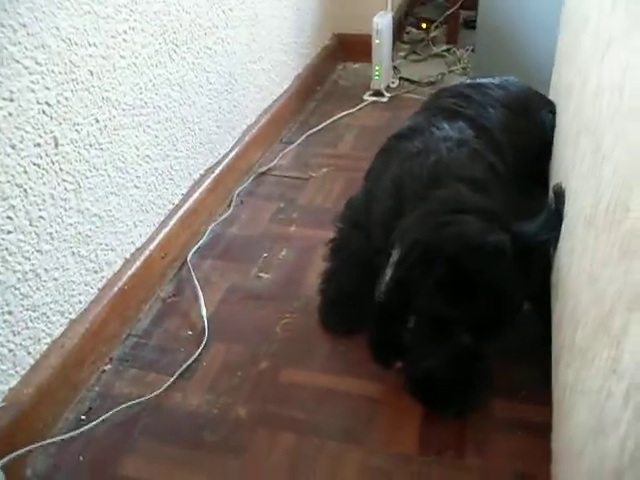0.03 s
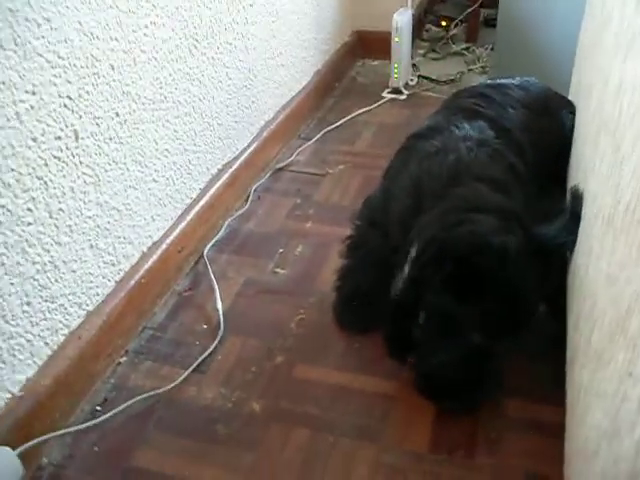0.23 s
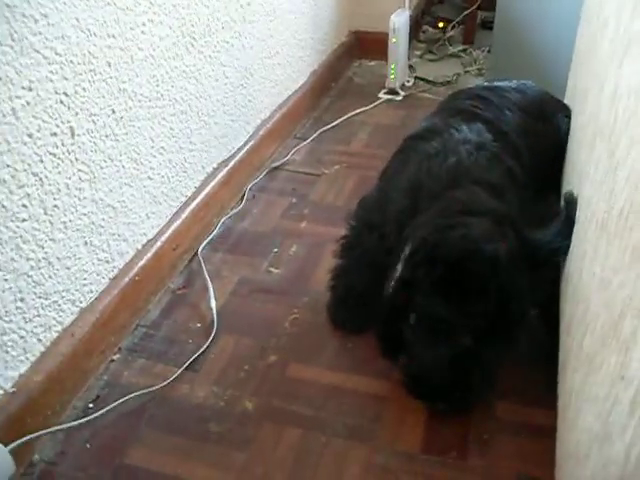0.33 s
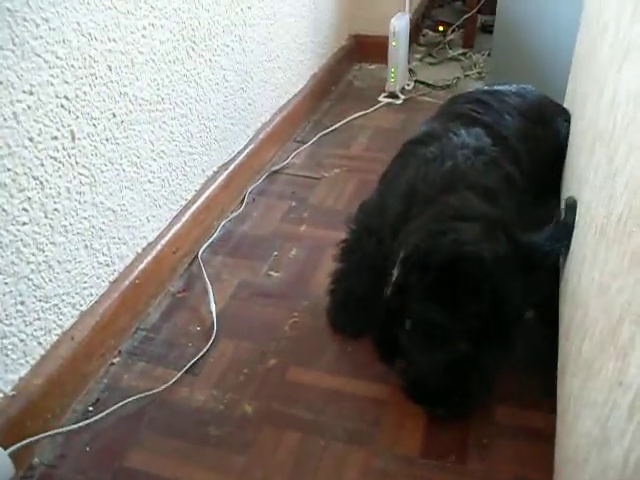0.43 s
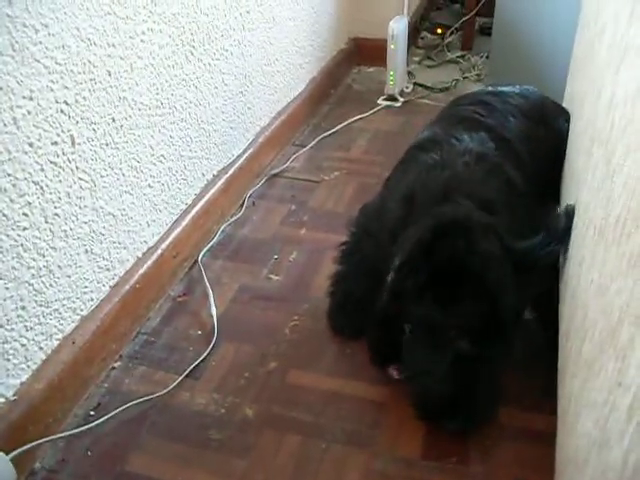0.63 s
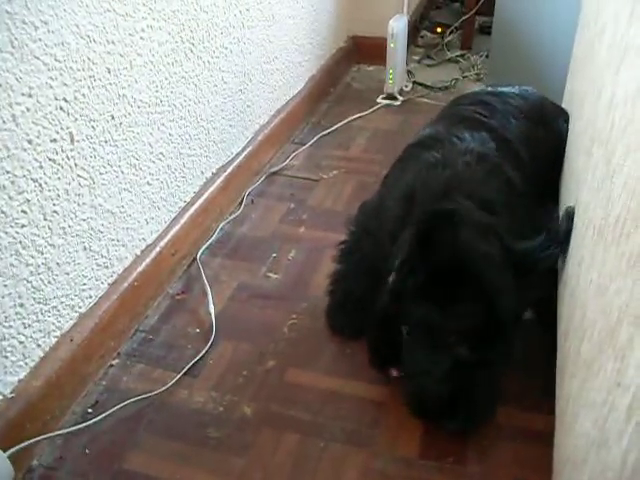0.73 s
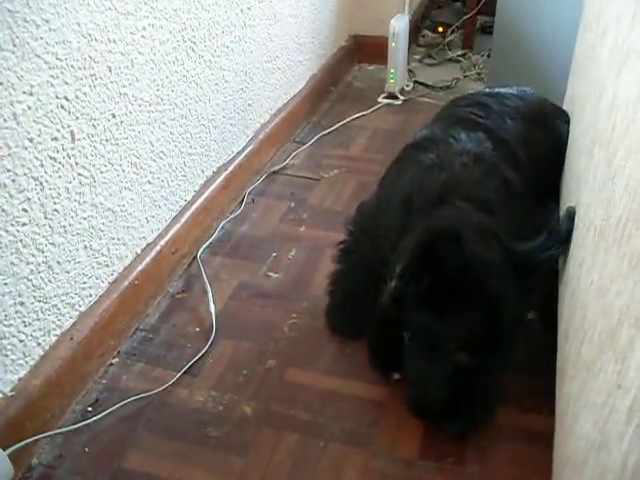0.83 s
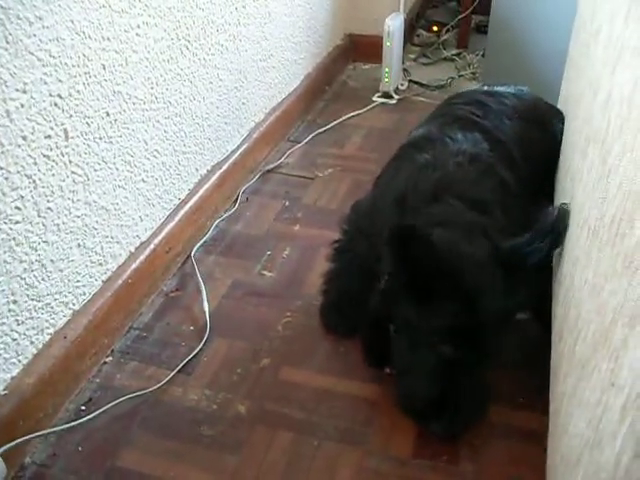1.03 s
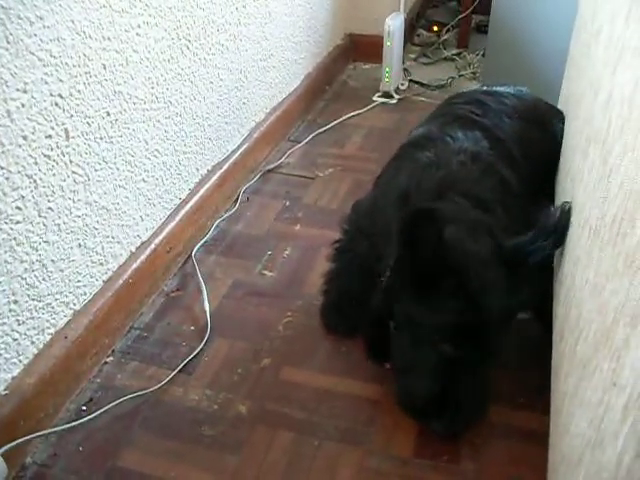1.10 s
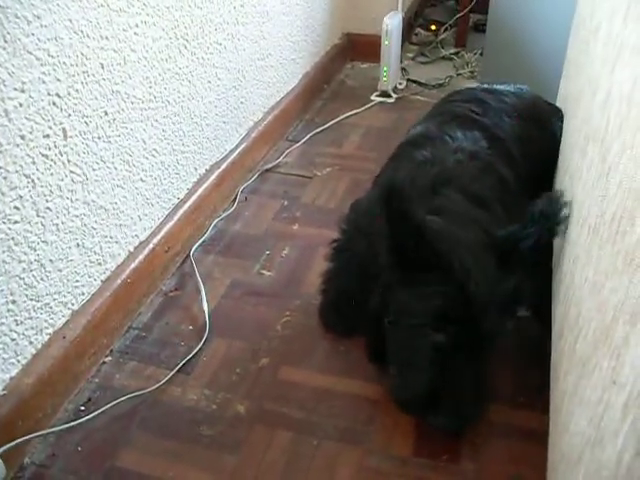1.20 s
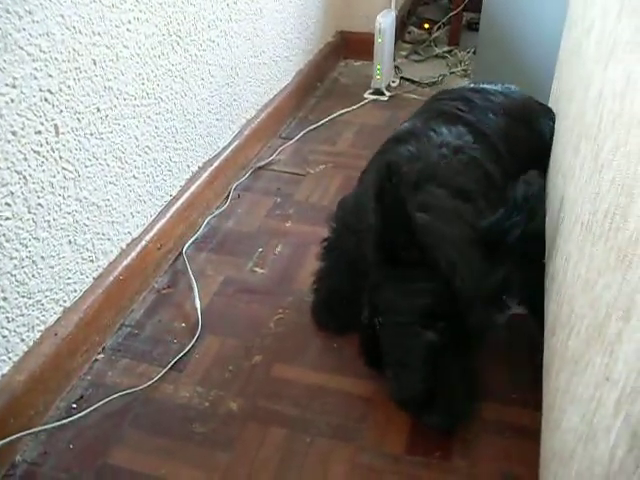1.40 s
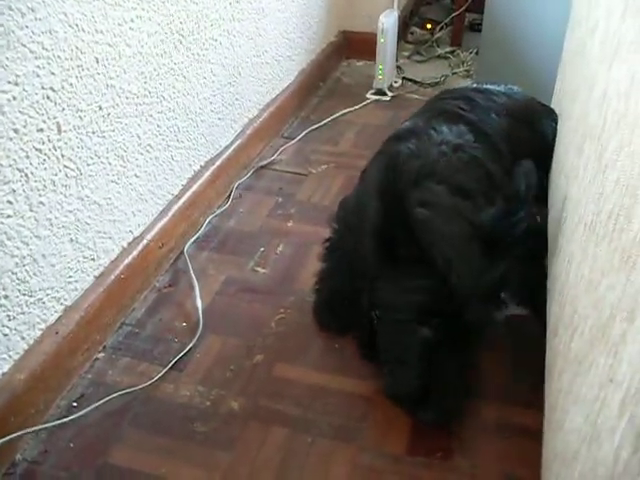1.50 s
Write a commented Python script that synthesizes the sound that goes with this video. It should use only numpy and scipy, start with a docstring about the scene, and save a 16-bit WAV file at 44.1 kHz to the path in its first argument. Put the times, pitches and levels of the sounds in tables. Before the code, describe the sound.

An empty plastic bottle hits a wooden floor with a loud, hollow, slightly distorted bonk at 0.2 seconds as a dog nudges it. A light tap at 0.5 leads into a quick triple rattle around 0.6. A hard clack lands near 1.2 seconds, then the bottle scuffs and slides with a hiss until about 1.5. The narrow hallway rings after each knock, over a faint low hum.

```python
"""First one deep, hollow bonk: a dog noses an empty plastic bottle on parquet in a narrow, bare hallway. A
quick triple rattle and a harder clack follow; the bottle scuffs the wood and at last the dog's paw scrapes with
a hiss. Each contact rings and cracks the shell and thumps the boards, and the hallway rings on over a low hum.
One small microphone stands in the hallway, recorded at a low sample rate, near enough to clip on the loudest
blows."""
import sys
import numpy as np
from scipy import signal
from scipy.fft import rfft, irfft, next_fast_len
from scipy.io import wavfile
from scipy.ndimage import uniform_filter1d, map_coordinates

SR = 44100
rng = np.random.default_rng(int(sys.argv[2]) if len(sys.argv) > 2 else 0)


def waveform_to_disk(signal):
    """Save audio, clipped to [-1, 1], as 16-bit WAV at the path in sys.argv[1]."""
    frames = np.transpose(np.atleast_2d(signal))
    scaled = np.clip(frames, -1, 1) * 32767
    samples = np.round(scaled).astype(np.int16)
    wavfile.write(sys.argv[1], SR, samples)


N = 68355

# room tone at the microphone: f/Hz, level/dB
ROOM_TONE = [(30, -24.5), (50, -7), (90, -8), (280, -13), (660, -20.5), (1600, -27.5), (3500, -29),
             (5400, -35.5)]
# course of the low hum: t/s, level/dB
HUM_LEVEL = [(0, -38.5), (.25, -36), (.34, -43), (.58, -38.5), (.7, -34), (.8, -34), (1.55, -32)]
# decay of the hallway's diffuse tail: f/Hz, t60/s
TAIL_T60 = [(150, 0.98), (500, 0.5194), (1400, 0.874), (4000, 0.5054)]
# colour of that tail: f/Hz, level/dB
TAIL_COLOUR = [(150, -8), (300, 5.5), (400, 4.5), (480, -10), (600, 1.5), (780, 3), (950, -4.5),
               (1200, -6.5), (2500, -5), (5000, -3)]
# standing waves between the walls: f/Hz, peak level/dB, t60/s
STANDING_WAVES = [(255.94, -4, 0.16), (372.8, -2, 0.5), (436.8, -1, 0.41), (524.4, -4, 0.22), (609, -9, .8),
                  (674.4, 3.5, 1), (810.5, -5, 0.4)]
# echoes off the near walls: delay/s, level/dB
WALL_ECHOES = [(.043, -20), (.058, -22), (.074, -20)]
# scuffs on the wood: start/s, rise/s, time to fall 20 dB/s (negative: it grows), level/dB, low cut/Hz
SCUFF_STROKES = [(0.939, 0.052, 0.0059, -38.5, 250), (1.118, 0.0407, 0.2133, -33, 720),
                 (1.269, 0.026, 0.3069, -35, 278), (1.488, 0.017, -2.75, -47, 248.8)]
# colour of a scuff: f/Hz, level/dB
SCUFF_COLOUR = [(150, -23.5), (400, 0), (1000, -1), (1600, -4.5), (2400, -4.5), (3500, -10), (5500, -23)]
# a light brush, then the long scrape of the dog's paw: t/s, level/dB
SCRAPE_LEVEL = [(.93, -70), (.97, -38.5), (1.03, -68), (1.26, -60), (1.325, -29.5), (1.38, -28.5),
                (1.425, -23), (1.47, -37), (1.55, -42.5)]
# hiss of the paw scraping: f/Hz, level/dB
SCRAPE_COLOUR = [(1000, -38.5), (3300, -9.5), (4400, 1), (5200, -2), (6000, 1.5)]
# modes of the hollow bottle against the boards: f/Hz, level/dB, t60/s
BOTTLE_MODES = [(248.6, -28, 0.04), (372.2, -22, 0.075), (474.6, 0, 0.0507), (532.2, -10, 0.1394),
                (595.8, -4, 0.0374), (685.45, -7, 0.049), (730.85, -10, 0.077), (823.7, -9.5, 0.094),
                (929.6, -11, 0.037), (1104.6, -5.5, 0.0462), (1221.2, -9.5, 0.036), (1524.5, -10, 0.041),
                (1728.7, -15, 0.04), (1871.4, -17, 0.04), (2104, -16.5, 0.047), (2473, -15.5, 0.047)]
# crack of the shell: f/Hz, level/dB
CRACK_COLOUR = [(200, -16), (500, 13.5), (1200, 3), (2100, -2.5), (2650, -3), (3300, -11), (3850, -3),
                (4150, -1.5), (4500, -3.5), (4800, -9.5), (6000, -18.5)]
# bottle contacts: t/s, strength/dB, lowest excited f/Hz, brightness/Hz, crack trim/dB, thump trim/dB,
# send to the hallway/dB, pitch factor of the flexed shell
CONTACTS = [(0.188, -25.5, 297, 891, 2.5, -2.5, -8.5, 1), (0.2004, 2.5, 300.5, 690, -6.5, -12, 1, 1),
            (0.2052, -9, 1004, 1600, 2.5, -25.5, -13.5, 1), (0.470, -21, 680, 1180, -10.5, -6.5, -2.5, .98),
            (0.498, -33, 506, 2622, 8, -4.5, 10, 1), (0.5776, -28, 352, 1200, 1, -10, -16.5, 1),
            (0.6014, -16.5, 387.8, 850, 0.5, 2.5, 5.5, 1.03), (0.6213, -11.5, 900, 2880, -3, -0.5, -6, .97),
            (0.6394, -10, 870, 1300, -0.5, -8, 1, 1.04), (0.6445, -18, 871, 1202, -6.5, -5.5, -0.5, .93),
            (1.126, -20, 837.3, 1470, -3.5, -7, 13.5, .92),
            (1.1681, -5, 999.6, 2500, -2.5, -13, -3.5, 1.01), (1.1763, -27, 1196, 2510, 12.5, -16, -7, 1),
            (1.176, -2, 602, 1650, -5, -14, -0.5, 1.01), (1.189, -29, 600, 1520, 15.5, -19.5, -15.5, 1),
            (1.217, -20, 700, 900, -20.5, -20.5, -2.5, 1), (1.285, -35, 400, 2130, 11.5, -0.5, 10.5, 1),
            (1.318, -29, 350, 1290, 3, 5.5, -5, 1), (1.362, -37.5, 500, 2000, 3.5, -42, -19.5, 1),
            (1.478, -50.5, 600, 2000, 16.5, 5.5, 3, 1)]

ROOM_TONE_DB, HUM_HZ, HUM_WAVER_HZ = -39, 34.6, .6
TAIL_DB, TAIL_FADE_DB_PER_S, HALL_BUILD_S, WALL_DULL_HZ = -3.5, 21, 0.012, 1080
GRAIN_DB, GRAINS_PER_S = 2.5, 350
RING_S, RING_SCATTER_DB, ATTACK_S = .2, 2, 0.000239
CRACK_DB, CRACK_T60_S = -11, 0.0702
SNAP_DB, SNAP_T60_S = 6.5, 0.0035  # the first, sharpest part of the crack
THUMP_DB, THUMP_S = 11.5, 0.000486
BAND_HZ, BAND_ORDER, CLIP_LEVEL = 5400, 26, .71
BAND_EDGE_HZ, OVERTONE_DB, TOP_HZ = 6000, -9, 16100  # clipping overtones above the band come out weaker


def amp(db):
    """Decibels to gain."""
    return 10 ** (np.asarray(db) / 20)


def unit(x):
    """Scale to rms 1."""
    return x / np.sqrt(np.mean(x ** 2) + 1e-20)


def along(points, hz):
    """Read (f/Hz, value) points at hz, on a log axis."""
    f, values = np.transpose(points)
    return np.interp(np.log(hz + 1), np.log(f + 1), values)


def level(rows):
    """Gain per sample from (t/s, level/dB) points."""
    return amp(np.interp(np.arange(N) / SR, *np.transpose(rows)))


def wobble(rate):
    """A smooth random curve, rate knots a second."""
    knots = rng.standard_normal(int(N * rate / SR) + 4)
    return map_coordinates(knots, [np.arange(N) * rate / SR])


def filtered(x, response):
    """x with its spectrum weighted by response(hz)."""
    size = next_fast_len(len(x) + len(x) // 2, real=True)
    return irfft(rfft(x, size) * response(np.fft.rfftfreq(size, 1 / SR)), size)[:len(x)]


def noise(colour, size=N):
    """Coloured noise of rms 1."""
    return unit(filtered(rng.standard_normal(size), lambda hz: amp(along(colour, hz))))


def lowpass(hz, corner_hz, order):
    """Gain of a flat low-pass; with the two frequencies swapped, a high-pass."""
    return 1 / np.sqrt(1 + (hz / corner_hz) ** (2 * order))


def delayed(x, s):
    """x starting s seconds later, N samples long."""
    return np.pad(x, (max(0, round(s * SR)), N))[:N]


def even(x):
    """x with the chance peaks and holes of its spectrum smoothed out."""
    spectrum = rfft(x, 2 * next_fast_len(len(x), real=True))
    smooth = uniform_filter1d(np.abs(spectrum), size=300)
    return irfft(spectrum * smooth / (np.abs(spectrum) + 1e-12))[:len(x)]


def room_tone():
    """The hallway at rest: steady noise and a wavering low hum."""
    cycles = np.cumsum(HUM_HZ + HUM_WAVER_HZ * wobble(rate=6.6)) / SR
    hum = level(HUM_LEVEL) * unit(np.sin(2 * np.pi * cycles))
    return amp(ROOM_TONE_DB) * noise(ROOM_TONE) + hum


def hallway(x):
    """What the bare walls send back to the microphone: a diffuse tail, standing waves and dull echoes."""
    hz, t, bands = signal.stft(rng.standard_normal(SR), SR, nperseg=256)
    decay = amp(along(TAIL_COLOUR, hz)[:, None] - 60 * t / along(TAIL_T60, hz)[:, None])
    bands = bands * decay * (1 - np.exp(-t / HALL_BUILD_S))
    tail = even(signal.istft(bands, SR, nperseg=256)[1])
    t = np.arange(len(tail)) / SR
    response = amp(TAIL_DB - TAIL_FADE_DB_PER_S * t) * tail / (2 * np.linalg.norm(tail))
    for wave_hz, db, t60 in STANDING_WAVES:
        swell = amp(-60 * t / t60) * (1 - np.exp(-t / HALL_BUILD_S))
        response += 2 * amp(db) * swell / swell.sum() * np.cos(2 * np.pi * wave_hz * t)
    dull = filtered(x, lambda f: lowpass(f, WALL_DULL_HZ, order=1))
    echoes = sum(amp(db) * delayed(dull, s) for s, db in WALL_ECHOES)
    return signal.fftconvolve(x, response)[:N] + echoes


def rubbing():
    """Plastic scuffs grainily on the wood, thinner when it barely touches, then the dog's paw scrapes with a
    hiss."""
    t = np.arange(N) / SR
    rub = level(SCRAPE_LEVEL) * noise(SCRAPE_COLOUR)
    grain = noise(SCUFF_COLOUR) * amp(GRAIN_DB * wobble(GRAINS_PER_S))
    for start, rise, fall, db, low_hz in SCUFF_STROKES:
        onset = np.clip((t - start) / rise, 0, 1)
        fade = amp(db - 20 * np.maximum(t - start - rise, 0) / fall)
        thinned = filtered(grain, lambda hz: lowpass(low_hz, hz + 1, order=3))
        rub += onset * fade * unit(thinned)
    return rub + hallway(rub)


def bottle_knocks():
    """Each contact rings and cracks the shell and thumps the boards; place and hardness pick the modes."""
    direct, to_hall = np.zeros(N), np.zeros(N)
    t = np.arange(int(RING_S * SR)) / SR
    hz, mode_db, t60 = np.transpose(BOTTLE_MODES)
    decays = amp(-60 * t / t60[:, None]) * (-1) ** np.arange(len(hz))[:, None]  # modes alternate in sign
    push = (1 - t / THUMP_S) * np.exp(-t / THUMP_S)  # the boards give one low push
    burst = amp(-60 * t / CRACK_T60_S) + amp(SNAP_DB - 60 * t / SNAP_T60_S)
    attack = 1 - np.exp(-t / ATTACK_S)
    for start, db, low_hz, bright_hz, crack_db, thump_db, hall_db, pitch in CONTACTS:
        modes = np.sin(2 * np.pi * pitch * hz[:, None] * t) * decays
        excited = lowpass(hz, bright_hz, order=2) * lowpass(low_hz, hz, order=3)
        scatter_db = RING_SCATTER_DB * rng.standard_normal(len(hz))
        ring = (amp(mode_db + scatter_db) * excited) @ modes
        crack = amp(CRACK_DB + crack_db) * burst * even(noise(CRACK_COLOUR, size=len(t)))
        thump = amp(THUMP_DB + thump_db) * push
        blow = delayed(amp(db) * (ring + crack + thump) * attack, start)
        direct += blow
        to_hall += amp(hall_db) * blow
    return direct + hallway(to_hall)


def scene():
    """Bottle and hallway as they reach the one microphone."""
    return (bottle_knocks() + room_tone() + rubbing())[None]


def record(dry):
    """A small microphone, recorded at a low sample rate that keeps only the lower band, whose signal clips on
    the hardest knocks."""
    narrow = filtered(dry[0], lambda hz: lowpass(hz, BAND_HZ, BAND_ORDER))
    clipped = np.clip(narrow, -CLIP_LEVEL, CLIP_LEVEL)
    shelf = lambda hz: np.maximum(lowpass(hz, BAND_EDGE_HZ, BAND_ORDER), amp(OVERTONE_DB))
    return filtered(clipped, lambda hz: shelf(hz) * (hz < TOP_HZ))[None]


dry = scene()
out = record(dry)
waveform_to_disk(out)
```